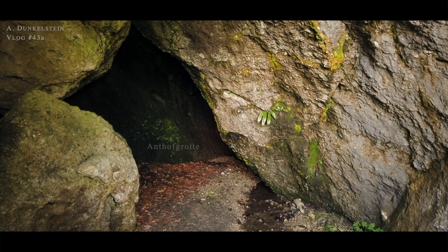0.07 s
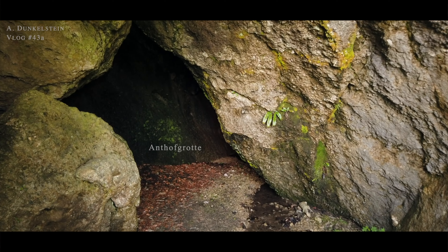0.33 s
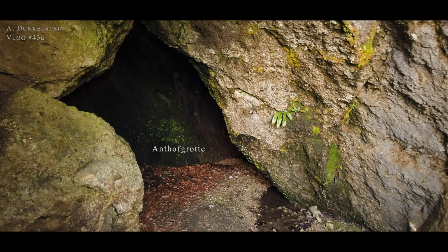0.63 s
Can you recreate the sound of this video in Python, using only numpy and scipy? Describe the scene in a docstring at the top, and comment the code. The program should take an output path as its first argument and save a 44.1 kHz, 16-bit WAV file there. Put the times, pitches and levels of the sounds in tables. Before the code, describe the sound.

Small water drops fall irregularly into puddles and onto rock in a damp, softly echoing cave.

```python
"""A faint, fine patter deep in a small, damp cave, then close, uneven drips falling from the roof. Each drop
slaps and throws spray; in a puddle it also traps a bubble that rings a short plip. Nearby rock scatters the
sound at once and the cave rings on briefly, differently from every spot. Larger bubbles gurgle softly now and
then, and some drops land with a low thump, over a far trickle and a low rumble of moving air."""
import sys
import numpy as np
from scipy import signal
from scipy.fft import rfft, irfft
from scipy.io import wavfile

SR = 44100
rng = np.random.default_rng(int(sys.argv[2]) if len(sys.argv) > 2 else 0)


def unload_wav(signal):
    """Save mono or channel-first audio to the path in sys.argv[1] as 16-bit WAV at rate SR, clipped to [-1, 1]."""
    wavfile.write(
        sys.argv[1],
        SR,
        np.round(np.clip(np.atleast_2d(signal).T, -1, 1) * 32767).astype(np.int16),
    )


N = 255339
RING_S = np.arange(14000) / SR  # time axis of the cave's ring
SHORT_S = RING_S[:1750]  # time axis of a bubble or of the first reflections

# Tone of the moving air: frequency_hz, gain_db
DRAUGHT_EQ = [(12, 0), (25, 22), (40, -5.5), (60, 7), (110, -28.5), (250, -9.5), (500, -64)]
# Tone of the fine, distant drops: frequency_hz, gain_db
PATTER_EQ = [(120, -18.5), (200, -19.5), (293, -11.5), (407, -17), (596, -9.5), (923, -14), (1400, -2.5),
             (1560, -9.5), (1680, -2.5), (3550, 2.5), (6830, -3), (8500, -2), (10000, -3.5), (13900, -11),
             (15500, -18)]
# Tone of a drop's impact: frequency_hz, gain_db
SLAP_EQ = [(60, -38), (150, -24), (400, -27), (750, -12.5), (1300, -4), (3000, -0.5), (4300, -5.5),
           (6000, -17.5), (15000, -36.5)]
# Tone of the thrown droplets: frequency_hz, gain_db
SPRAY_EQ = [(300, -34), (1000, -47), (2000, -59), (3800, 5.5), (6500, -0.5), (9000, 2.5), (12000, -2.5),
            (15500, -14)]
# Strength of the distant seeping water: time_s, level_db
SEEP_CURVE = [(0, -55.5), (.9, -55.5), (1.8, -53.5), (4.1, -52), (4.75, -49), (5.2, -52), (5.79, -50)]
# Low gurgles of larger bubbles, and low thumps under some drops' slaps: start_s, pitch_hz, level_db
LOW_GURGLES_AND_THUMPS = [(.028, 950, -62), (.836, 1110, -59.5), (.998, 577, -62), (1.045, 454, -66),
                          (1.155, 754, -61), (1.186, 990, -59.5), (1.66, 507, -68), (1.725, 527, -72),
                          (2.3, 770, -64), (2.575, 600, -58), (3.035, 610, -59.5), (3.191, 1330, -57),
                          (4.243, 1100, -58.5), (4.445, 740, -62), (4.47, 442, -66), (4.556, 757, -55.5),
                          (5.645, 706, -52.5), (5.695, 656, -60)]
# Drops landing in puddles: start_s, pitch_hz, plip_db, slap_db, spray_db
PUDDLE_HITS = [(0.1229, 1750, -47.5, -48, -55.5), (.206, 2950, -48, -57, -49),
               (.289, 2080, -57, -52.5, -52), (.467, 4660, -54, -59, -54), (.618, 2010, -53, -56, -58),
               (0.9974, 1220, -50, -44, -49.5), (1.0595, 4000, -44, -53, -47.5),
               (1.275, 3130, -49, -48.5, -49.5), (1.488, 1880, -42.5, -46.5, -52),
               (1.869, 2500, -48, -49.5, -50), (1.897, 1630, -41, -40, -48.5),
               (2.031, 1740, -50.5, -46.5, -51.5), (2.084, 2680, -51, -72, -52.5),
               (2.32, 2720, -48.5, -58, -51), (2.573, 2410, -44, -43, -47.5),
               (2.619, 2510, -60, -44, -51.5), (2.72, 4560, -48.5, -49, -50),
               (3.028, 3420, -48, -47.5, -44), (3.128, 1940, -50, -70, -69),
               (3.215, 4200, -51.5, -56, -49.5), (3.5156, 1570, -35.5, -37.5, -52.5),
               (3.749, 2370, -42.5, -44.5, -46.5), (3.7641, 2100, -31.5, -40, -49),
               (3.904, 2830, -46.5, -56, -59), (4.187, 3100, -45, -52, -47), (4.205, 3800, -47.5, -52, -47),
               (4.546, 1420, -43.5, -41.5, -49), (4.559, 1750, -43.5, -48, -51),
               (4.873, 2940, -44, -64, -50), (4.899, 2680, -41, -39, -42), (5.313, 4060, -50, -39, -42),
               (5.334, 1170, -49.5, -60, -47.5), (5.415, 2800, -46, -53, -49),
               (5.592, 1720, -46.5, -45, -44.5)]
# Drops bursting on bare rock, trapping no air: start_s, slap_db, spray_db
ROCK_HITS = [(.274, -52.5, -52.5), (.497, -51.5, -68), (.726, -49, -49.5), (1.22, -66, -50.5),
             (1.313, -49.5, -51), (1.467, -57.5, -52.5), (1.664, -60.5, -44.5), (2.013, -50, -50),
             (2.342, -53, -51.5), (2.556, -50, -58), (3.037, -47.5, -59), (3.438, -74, -51),
             (3.94, -51.5, -46.5), (3.984, -51.5, -48.5), (4.17, -55, -48.5), (4.316, -57.5, -50.5),
             (4.404, -49.5, -47), (4.744, -45.5, -48), (5.064, -48.5, -49), (5.074, -39.5, -47.5),
             (5.702, -56, -49)]
# Splashes deeper in the cave, heard only as swells of patter: start_s, gain_db
DEEP_SPLASHES = [(0.691, -50), (2.16, -49), (2.329, -43), (3.16, -50), (3.705, -49), (4.8, -46),
                 (5.035, -46.5), (5.27, -44.5), (5.525, -55)]


def undb(db):
    """Decibels to gain."""
    return 10 ** (np.asarray(db) / 20)


def unit(x):
    """Scale to rms 1."""
    return x / np.sqrt(np.mean(x ** 2))


def set_attack(sound, db):
    """Scale a sound so that its first 14 ms have this rms level."""
    return sound * undb(db) / np.sqrt(np.mean(sound[:, :600] ** 2))


def equalise(x, curve):
    """Minimum-phase EQ through (frequency_hz, gain_db) points, so nothing rings ahead of a hit."""
    size = 2048
    hz, db = np.transpose(curve)
    bin_hz = np.arange(size // 2 + 1) * SR / size
    gain = undb(np.interp(np.log(bin_hz + 1), np.log(hz), db))
    cepstrum = irfft(np.log(gain))
    cepstrum[1:size // 2] *= 2
    cepstrum[size // 2 + 1:] = 0
    impulse = irfft(np.exp(rfft(cepstrum)))
    return signal.fftconvolve(x, impulse[None], axes=1)[:, :x.shape[1]]


def stereo(pair, width):
    """Use two unrelated signals as mid and side."""
    return (pair[0] + width * pair[1] * np.array([[1], [-1]])) / np.sqrt(1 + width ** 2)


def add(out, start_s, sound):
    """Mix a sound in at its cue."""
    i = max(int(start_s * SR), 0)
    out[:, i:i + sound.shape[1]] += sound[:, :max(N - i, 0)]


def cave(near_s, direct, rise_s, wet_db, t60_s, widths):
    """Reverb from one spot: direct hit, tight scatter off near rock, diffuse ring; widths: (near, far)."""
    shape = (2, len(SHORT_S))
    near = rng.standard_normal(shape) * (rng.random(shape) < .2)
    near *= (1 - np.exp(-SHORT_S / rise_s)) / np.sqrt(1 + (SHORT_S / near_s) ** 8)
    near[0, 0] += direct
    bloom = 1 - np.exp(-(RING_S / 0.012) ** 2)
    decay = np.exp(-np.log(1000) * RING_S / t60_s)
    far = rng.standard_normal((2, len(RING_S))) * bloom * decay
    reverb = undb(wet_db) * stereo(far / np.linalg.norm(far), widths[1])
    reverb[:, :len(SHORT_S)] += stereo(near / np.linalg.norm(near), widths[0])
    return reverb


def patter(drops_per_s=70, spread_db=6.5, smear_s=0.026, wash=1.0):
    """Fine far drops, each smeared to a short hiss, over a wash of merged echo; the treble is wider."""
    lands = rng.random(N) < drops_per_s / SR
    hit_power = lands * undb(spread_db * np.clip(rng.standard_normal(N), -2, 2)) ** 2
    power = signal.lfilter([1], [1, -np.exp(-1 / (smear_s * SR))], hit_power)
    envelope = np.sqrt(wash + power / power.mean())
    hiss = equalise(rng.standard_normal((2, N)) * envelope, PATTER_EQ)
    body = signal.sosfilt(signal.butter(1, 3500, fs=SR, output="sos"), hiss)
    return unit(stereo(body, width=0.29) + stereo(hiss - body, width=0.69))


def draught(level_db=-68):
    """Moving air lays a faint, steady rumble under everything."""
    rumble = equalise(rng.standard_normal((2, N)), DRAUGHT_EQ)
    return undb(level_db) * unit(stereo(rumble, width=1.0))


def bubble(hz, cycles, glide):
    """Trapped air rings: it peaks after `cycles`, then fades as its pitch rises by about `glide` * hz."""
    age = SHORT_S * hz / cycles
    phase = 2 * np.pi * hz * SHORT_S * (1 + glide * np.tanh(age / 4))
    return (age * np.exp(-age) * np.sin(phase))[None]


def trickle(count=280, low_hz=650, high_hz=4500, level_db=-64):
    """Faint random bubbles far in, heard mostly as echo; the small ones are higher and louder."""
    out = np.zeros((2, N))
    for when, smallness, strength in rng.random((count, 3)):
        ring = bubble(low_hz * (high_hz / low_hz) ** smallness, cycles=1.0, glide=0.047)
        add(out, when * N / SR, undb(8 * strength + 15 * smallness) * ring)
    reverb = cave(near_s=.009, direct=3.0, rise_s=.0003, wet_db=-1.0, t60_s=.45, widths=(.3, .55))
    return undb(level_db) * unit(signal.fftconvolve(out, reverb, axes=1)[:, :N])


def plip(hz, level_db, reverb, cycles, glide):
    """One bubble ringing out through the cave."""
    ring = signal.fftconvolve(reverb, bubble(hz, cycles, glide), axes=1)
    return set_attack(ring[:, :len(RING_S)], level_db)


def gurgles():
    """Larger, softer bubbles and low thumps under some drops, blurred by the rock around them."""
    out = np.zeros((2, N))
    for start_s, hz, level_db in LOW_GURGLES_AND_THUMPS:
        reverb = cave(near_s=.008, direct=7.0, rise_s=.0003, wet_db=-4.0, t60_s=.45, widths=(.22, .45))
        add(out, start_s, plip(hz, level_db, reverb, cycles=2.1, glide=.054))
    return out


def nearness(level_db, close_db=-44, db_per_db=0.48):
    """Weight of the direct hit: fainter drops are further off, so they sound wetter."""
    return undb(db_per_db * min(level_db - close_db, 0))


def splash(slap_db, spray_db):
    """The dull slap of a drop, and the wide fizz of droplets landing around it."""
    impact = cave(near_s=.0099, direct=1.6 * nearness(slap_db), rise_s=.00027,
                  wet_db=-.25, t60_s=.52, widths=(.22, .33))
    slap = equalise(impact, SLAP_EQ)
    # no two splashes have quite the same colour
    shade = [(hz, db + 1.8 * rng.standard_normal()) for hz, db in SPRAY_EQ]
    droplets = cave(near_s=.011, direct=4.3 * nearness(spray_db), rise_s=.00035,
                    wet_db=-.3, t60_s=.24, widths=(.77, .63))
    fizz = equalise(droplets, shade)
    return set_attack(slap, slap_db) + set_attack(fizz, spray_db)


def drips():
    """Every drop splashes; in a puddle it also rings a plip, for more cycles the smaller its bubble."""
    out = np.zeros((2, N))
    for start_s, hz, plip_db, slap_db, spray_db in PUDDLE_HITS:
        reverb = cave(near_s=.008, direct=4.9 * nearness(plip_db), rise_s=.00016,
                      wet_db=-2.0, t60_s=.44, widths=(.27, .4))
        ring = plip(hz, plip_db, reverb, cycles=(hz / 2000) ** 0.1, glide=.0055)
        add(out, start_s, ring + splash(slap_db, spray_db))
    for start_s, slap_db, spray_db in ROCK_HITS:
        add(out, start_s, splash(slap_db, spray_db))
    return out


def swell(gain_db, rise_s, fall_s):
    """Power envelope of a shower that gathers gently and thins out."""
    gather = 1 - np.exp(-(RING_S / rise_s) ** 2)
    return undb(gain_db) ** 2 * (gather * np.exp(-RING_S / fall_s))[None]


def showers():
    """Extra patter power as each near drop's spray falls back, and from splashes deeper in."""
    power = np.zeros((1, N))
    for start_s, *_, spray_db in PUDDLE_HITS + ROCK_HITS:
        add(power, start_s, swell(spray_db - 2, rise_s=.018, fall_s=.013))
    for start_s, gain_db in DEEP_SPLASHES:
        add(power, start_s, swell(gain_db, rise_s=.0076, fall_s=.039))
    return power[0]


def stray_plips(count=22, low_hz=520, high_hz=5000, low_db=-70, high_db=-57):
    """Faint, loosely spaced plips from all over the floor; the small, high ones are louder."""
    out = np.zeros((2, N))
    for slot, (offset, smallness) in enumerate(rng.random((count, 2))):
        hz = low_hz * (high_hz / low_hz) ** smallness
        level_db = low_db + (high_db - low_db) * smallness
        reverb = cave(near_s=.0069, direct=18.0, rise_s=.00036, wet_db=-2.5, t60_s=.72, widths=(.68, .45))
        add(out, (slot + offset) / count * N / SR, plip(hz, level_db, reverb, cycles=1.1, glide=.047))
    return out


def scene():
    """Drips and gurgles up front; behind them the draught, and trickle and patter swelling together."""
    seep = undb(np.interp(np.arange(N) / SR, *np.transpose(SEEP_CURVE)))
    patter_gain = np.sqrt(seep ** 2 + showers())
    far_water = trickle() * unit(seep) + patter_gain * patter()
    return far_water + draught() + stray_plips() + drips() + gurgles()


def record(dry):
    """A steep high cut takes off the very top."""
    cutoff_hz = 15750
    return signal.sosfilt(signal.ellip(10, .2, 80, cutoff_hz, fs=SR, output="sos"), dry)


dry = scene()
out = record(dry)
unload_wav(out)
```